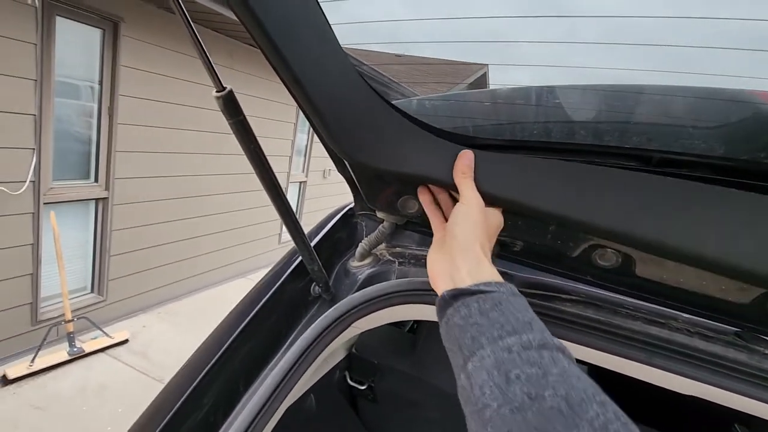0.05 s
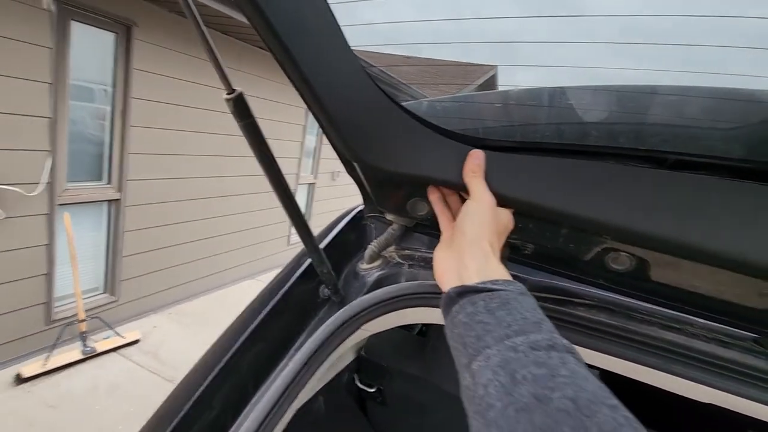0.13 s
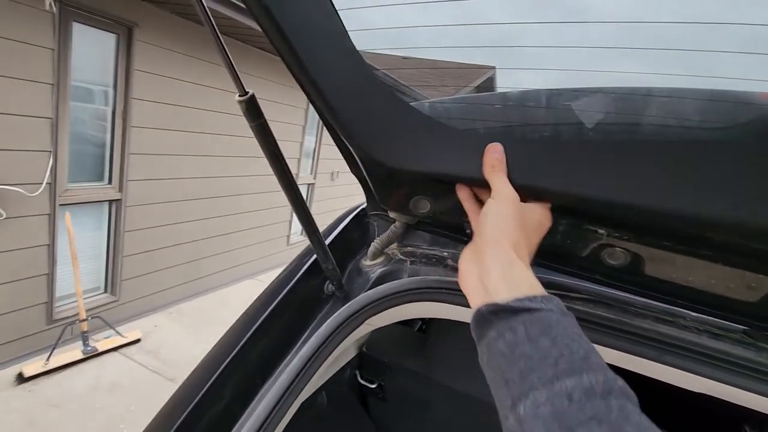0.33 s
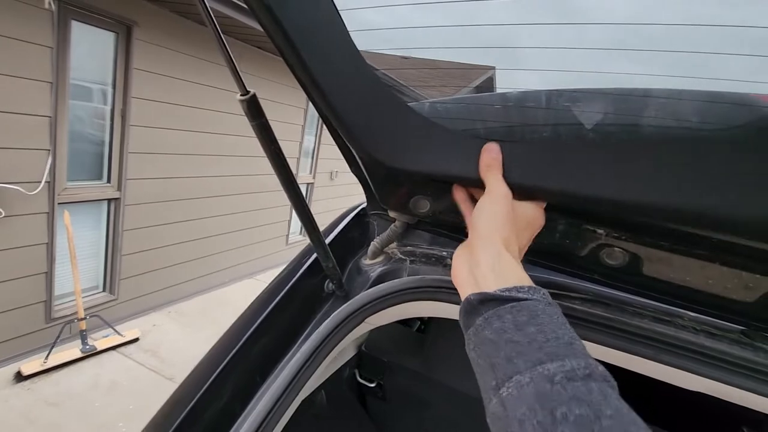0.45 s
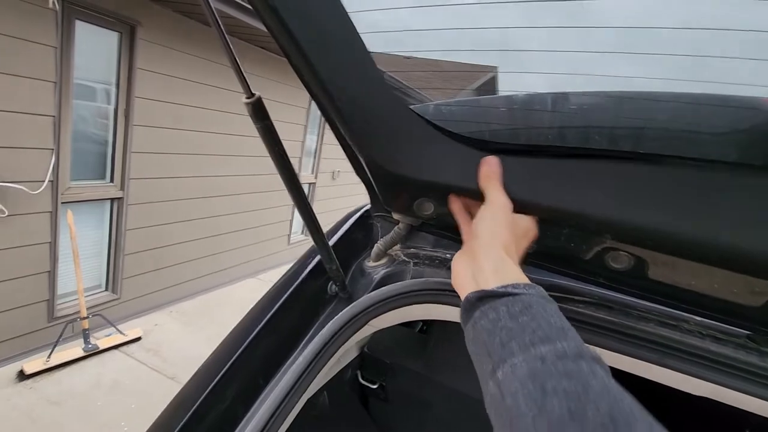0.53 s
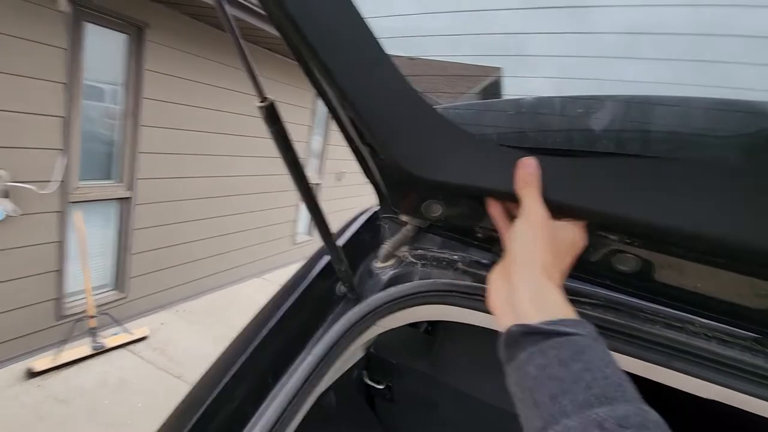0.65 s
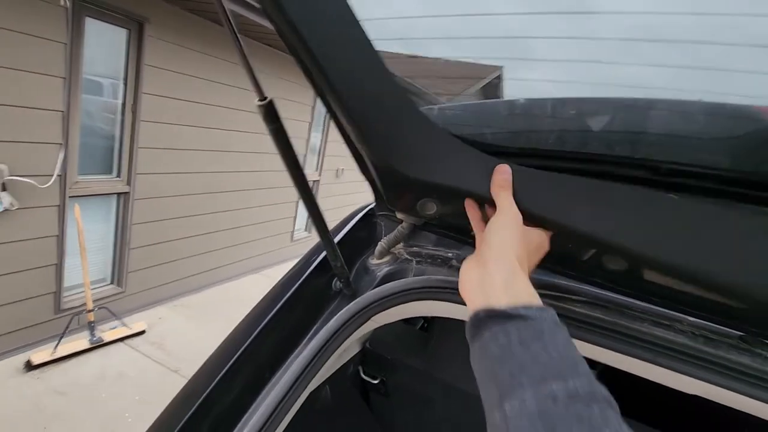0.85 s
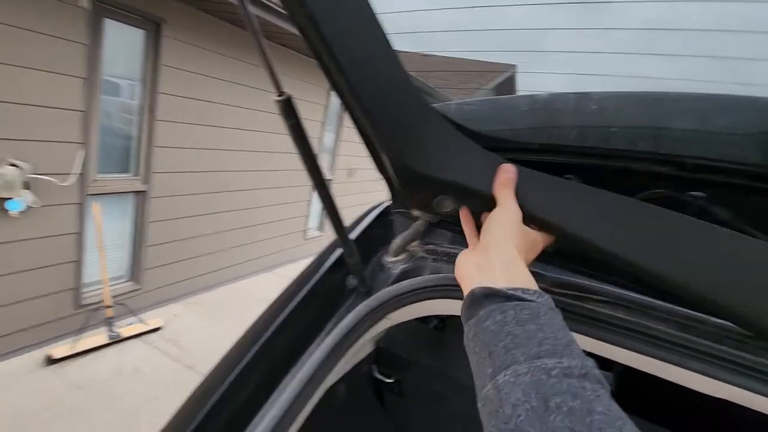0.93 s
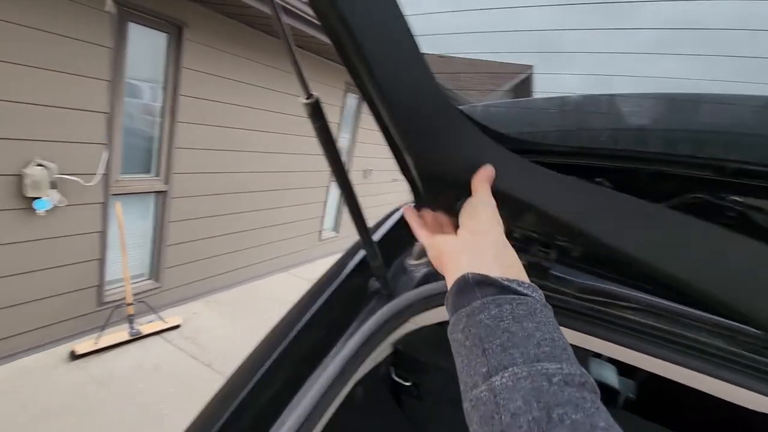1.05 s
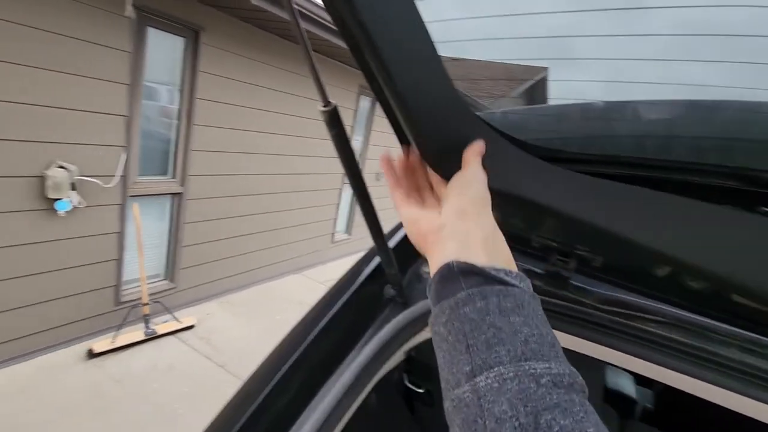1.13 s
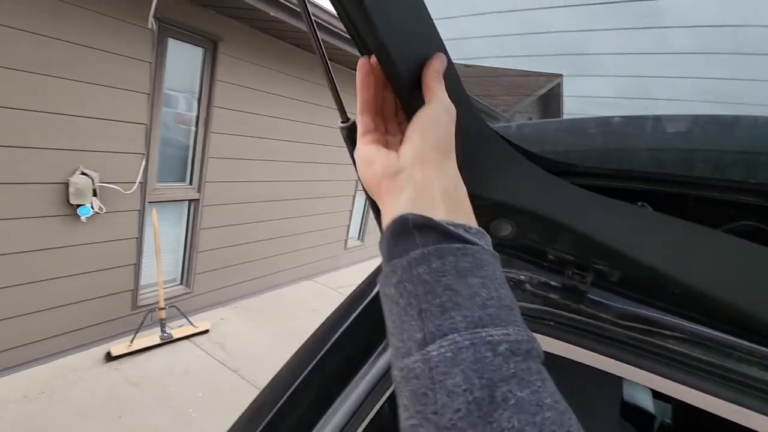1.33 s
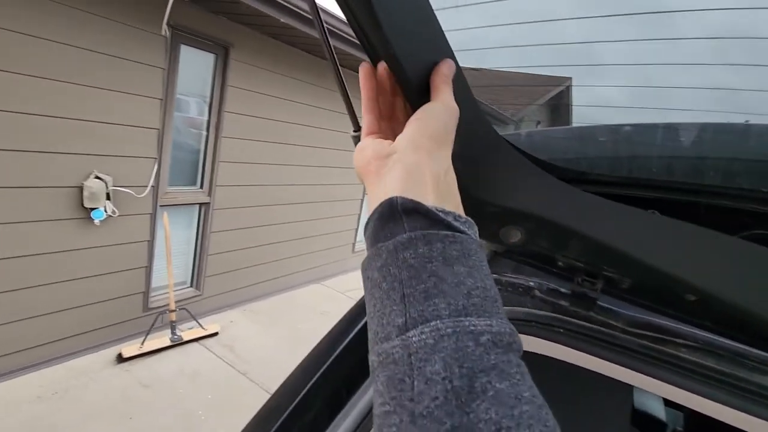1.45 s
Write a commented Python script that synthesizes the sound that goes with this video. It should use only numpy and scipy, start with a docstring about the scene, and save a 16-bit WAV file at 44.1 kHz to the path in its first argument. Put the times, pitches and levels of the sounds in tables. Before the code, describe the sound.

Close plastic snaps come from a car hatch trim panel being pulled loose outdoors. A few clicks, a tiny squeak and one loud crack give way to softer knocks and light hand rubbing, with traffic rumbling faintly far away.

```python
"""Plastic clips slip and snap close by as a hand pulls a trim panel off an open car hatch.
Each snap cracks, knocks the panel's edge, sets its large face booming and rings the steel behind.
The loosened panel shudders. Hiss and scrape come from the rubbing palm and around the biggest snap.
Brief thin tones sound, the loudest just before that snap.
The hatch opening briefly echoes the snaps and tones, and distant traffic rumbles outdoors."""
import sys
import numpy as np
from scipy import signal
from scipy.fft import rfft, irfft, next_fast_len
from scipy.io import wavfile
from scipy.ndimage import map_coordinates

SR = 44100
rng = np.random.default_rng(int(sys.argv[2]) if len(sys.argv) > 2 else 0)


def to_wav(sig):
    """Store sig (one row per channel, or 1-D mono) as 16-bit WAV at the path in sys.argv[1].

    Samples outside -1..1 are clipped; the rate is SR.
    """
    pcm = np.clip(np.atleast_2d(sig), -1, 1) * 32767
    pcm = np.round(pcm).astype(np.int16)
    wavfile.write(sys.argv[1], SR, pcm.T)  # frames by channels


N = 66150

# The tones each part rings at. Each row: pitch in Hz, width in Hz, level in dB.
CLIP_TONES = [(2122, 14, 8.5), (2543, 9.5, 7.5), (3035, 45, 7), (3930, 51, 9.5), (4740, 81, 2),
              (5960, 110, 0.5)]
FACE_TONES = [(117, 15, 6.5), (177.9, 28.2, 7), (255.5, 28.5, 3.5), (406, 130, -7.5)]
SIZZLE_TONES = [(5600, 700, 0), (7500, 770, -0.5), (11950, 910, 0), (14200, 1800, -6)]
STEEL_TONES = [(2478, 50, 4.5), (3604, 240, -9), (5720, 56, -7.5)]
# The panel edge's knock. Each row: multiple of the lowest pitch, width in Hz, level in dB.
EDGE_TONES = [(1, 55, 1), (1.22, 90, -9), (1.68, 90, 0), (2.6, 150, -7)]
# How a snap reaches the two sides. Each row: frequency in Hz, left's lag behind right in radians.
SIDE_LAG = [(200, 0.33), (600, 0.47), (2000, 1.67), (5000, 1.59), (9000, 1.5), (14000, 1.1)]
# Each row: frequency in Hz, left over right in dB.
SIDE_BALANCE = [(100, 2.5), (300, 1), (700, 4.5), (1400, -2), (2800, -5.5), (5600, 8.6), (12000, 1)]
# Each row: start in seconds, crack level in dB, knock, boom and sizzle in dB over the crack,
# left over right in dB, tick fade in seconds, rattle in dB over the tick, rattle fade in seconds,
# lowest knock pitch in Hz. A fade is the time it takes to drop by 60 dB.
SNAPS = [(0.2124, -40, -1, 7, -4.5, -1, 0.012, 4.5, 0.14, 630),
         (.226, -43, 13.5, 10.5, -12.5, -2, .02, -1.5, 0.053, 484),
         (.2395, -25, 4.5, 1, -9.5, 1.5, 0.046, -4.5, 0.051, 788),
         (.255, -38.5, 17, 14.5, -23, -1, 0.014, -4, 0.11, 509),
         (0.4942, -29, 7, -5, -22.5, 0.5, 0.09, -1.5, 0.22, 647),
         (0.5064, -5.5, -3, -10, -11, 0.5, 0.058, -7, 0.095, 593),
         (0.5861, -39.5, -1.5, 1.5, -12.5, -2, 0.088, -3.5, 0.18, 574),
         (.6824, -54.5, 6.5, 21.5, -30, 3, 0.023, -4, 0.044, 583),
         (0.8472, -32.5, 5.5, -6.5, -24.5, 2, 0.044, -11.5, 0.294, 698),
         (.876, -48, 12.5, 16.5, -15, -5, .03, -4, 0.25, 634),
         (0.9027, -58, 16, 1, -7, -18, .01, 1, 0.088, 680),
         (0.9348, -57, 9.5, 11.5, -10, 1.5, 0.013, 8.5, 0.32, 657),
         (0.9563, -46.5, 10, 20, -22, -2, 0.027, 4.5, 0.091, 557),
         (1.02, -61, 15, -4, -29, 2.5, 0.022, 3, 0.063, 682),
         (1.0658, -74.5, 22.5, 21.5, -24, 8.5, 0.038, 2.5, 0.041, 718),
         (1.0897, -40, -37, -16.5, -5.5, 0.5, 0.033, -31.5, 0.049, 625),
         (1.1435, -41, 1.5, 11.5, -9, -0.5, 0.014, -33, 0.068, 652),
         (1.2436, -49, -13, 5, -31, 5, 0.011, -2, 0.24, 657)]


def clip_snaps():
    out, t = np.zeros((2, N + SR)), np.arange(SR // 2) / SR
    first_blow = amp(7) * np.exp(-(t / .00032 - 2) ** 2)

    def pulse(fade_s, rise_s=.00036, hold_s=.00067):
        return (1 - np.exp(-t / rise_s)) * amp(-60 * np.maximum(t - hold_s, 0) / max(fade_s, .003))

    def crack(hz):  # plastic barely rings: wide tones, dulled above 6500 Hz
        return resonances(CLIP_TONES, widen=13)(hz) / (1 + 1j * hz / 6500) ** 2

    def to_stereo(hz):
        right = np.exp(.5j * along(SIDE_LAG, hz)) * amp(-along(SIDE_BALANCE, hz) / 2)
        return np.array([1 / right, right])

    for start, db, knock_db, boom_db, sizzle_db, pan_db, tick_s, rattle_db, rattle_s, knock_hz in SNAPS:
        lumps = amp(2.3 * rng.standard_normal(len(t) // 40 + 1).repeat(40)[:len(t)])
        edge = [(knock_hz * ratio, width, level) for ratio, width, level in EDGE_TONES]
        burst = lambda stretch: pulse(tick_s * stretch) + amp(rattle_db) * pulse(rattle_s * stretch)
        parts = [(crack, burst(1), 0),
                 (resonances(edge), burst(1.32), knock_db),
                 (resonances(FACE_TONES), burst(1), boom_db),
                 (resonances(SIZZLE_TONES), burst(.96), sizzle_db),
                 (resonances(STEEL_TONES), pulse(fade_s=.44), -30.5)]
        snap = 0
        for response, shape, part_db in parts:
            tiny_impacts = rng.standard_normal(len(t)) * lumps
            ring = filtered((first_blow + tiny_impacts) * shape, response)
            snap += .5 * amp(db + part_db) * ring / np.linalg.norm(ring) * np.linalg.norm(shape)
        at = round(start * SR)
        out[:, at:at + len(t)] += filtered(snap, to_stereo) * amp([[pan_db / 2], [-pan_db / 2]])
    return out[:, :N]


# Each row: time in seconds, level of the face's deep tones in dB, level of its upper tones in dB.
SHUDDER_LEVELS = [(0.0, -52, -72), (0.028, -52.5, -50.5), (0.17, -80, -92), (0.242, -50, -30.5),
                  (0.308, -38.5, -40.5), (0.4, -58, -63), (0.458, -61.5, -50), (0.504, -39.5, -34.5),
                  (0.546, -26, -30), (0.568, -28.5, -36.5), (0.604, -45.5, -42.5), (0.634, -29, -44.5),
                  (0.66, -39.5, -51), (0.746, -40, -88), (0.806, -49.5, -60), (0.876, -30.5, -41),
                  (0.918, -50, -44.5), (0.976, -30.5, -33.5), (1.102, -65, -65.5), (1.14, -45.5, -50.5),
                  (1.408, -75.5, -98), (1.5, -64.5, -47.5)]


def panel_shudder():
    """The loosened panel flexes and shudders at the low tones of its face."""
    deep_db, upper_db = curves(SHUDDER_LEVELS)

    def shudder(level_db, tones, cut_below_hz):
        response = lambda hz: resonances(tones)(hz) * np.clip(hz / cut_below_hz, 0, 1) ** 4
        return amp(level_db) * stereo_noise(response)

    deep = shudder(deep_db + .67 * wobble(29.16), FACE_TONES[:2], cut_below_hz=130)
    upper = shudder(upper_db + 3.1 * wobble(30), FACE_TONES[2:], cut_below_hz=200)
    return deep + upper


# The tone colour of the hiss and the scrape. Each row: frequency in Hz, strength in dB.
HISS_COLOUR = [(5000, -39), (8500, -9), (9610, -14), (11700, 2.5), (13400, -1.5), (14900, 3.5),
               (15900, -28.5)]
SCRAPE_COLOUR = [(1060, -51.5), (1800, -15.5), (1970, -27.5), (2200, -19.5), (2530, -20), (3230, -5),
                 (5260, -17), (7450, -13), (9500, -33.5), (12400, -63), (20900, -120)]
# Each row: start, length, rise and fall in seconds (per 20 dB), hiss in dB, scrape in dB.
SCRAPE_SWELLS = [(0.019, 0.02, 0.008, 0.034, -70.5, -68.5), (0.196, .045, .004, 0.0087, -70, -60.5),
                 (0.26, 0.15, .02, 0.043, -83, -75), (0.497, .009, 0.014, 0.0089, -65.5, -33),
                 (0.509, 0.062, 0.014, 0.045, -78, -53), (0.812, 0.068, 0.014, 0.035, -60.5, -61),
                 (.935, .04, .01, 0.015, -65, -73), (1.024, 0.016, 0.011, 0.024, -91, -69),
                 (1.105, 0.024, 0.012, 0.0086, -80, -71), (1.143, 0.071, 0.0052, 0.09, -69.5, -58.5),
                 (1.248, 0.1, 0.024, 0.048, -62.5, -62.5), (1.487, .03, 0.031, 0.0086, -66.5, -58)]


def hiss_and_scrape():
    """Swells of noise: the hand rubbing the plastic, plus the big snap's lead-in and rattling tail."""
    t, hiss, scrape = np.arange(N) / SR, 0, 0
    for start, length, rise, fall, hiss_db, scrape_db in SCRAPE_SWELLS:
        outside_swell = np.maximum((start - t) / rise, (t - start - length) / fall)
        shape = amp(-20 * np.maximum(0, outside_swell))
        hiss += amp(hiss_db) * shape
        scrape += amp(scrape_db) * shape
    hiss = hiss * amp(1.5 * wobble(60.2)) * coloured_noise(HISS_COLOUR)
    scrape = scrape * amp(3.2 * wobble(120)) * coloured_noise(SCRAPE_COLOUR)
    return hiss + scrape


# Each row: start in seconds, length in seconds, pitch in Hz, level in dB.
THIN_TONES = [(.02, .06, 600, -58), (.308, .01, 3300, -58), (.482, .01, 2450, -46), (.488, .017, 3700, -28),
              (.496, .01, 5600, -36), (.567, .006, 2100, -46), (.584, .01, 2430, -35),
              (.885, .02, 2300, -48), (1.172, .022, 3500, -59)]


def thin_tones():
    """Brief, thin, unsteady tones, the loudest just before the big snap."""
    t, out = np.arange(N) / SR, 0
    for start, length, hz, db in THIN_TONES:
        shape = np.clip(np.minimum(t - start, start + length - t) / .004 + 1, 0, 1) ** 2
        phase = 2 * np.pi * np.cumsum(hz * (1 + .012 * wobble(300))) / SR
        out += amp(db + 3 * wobble(400)) * shape * np.array([np.cos(phase), np.sin(phase)])
    return out


# Each row: frequency in Hz, seconds the echo takes to drop by 60 dB.
ECHO_FADES = [(300, 0.57), (2500, 0.34), (6000, 0.47), (12000, 0.57)]


def hatch_echo(sound):
    """The hatch opening throws sound back, and each frequency dies away at its own speed."""
    hz, t, noise = signal.stft(rng.standard_normal((2, SR // 2)), SR, nperseg=256)
    fade = amp(-60 * t / along(ECHO_FADES, hz)[:, None]) * (hz > 300)[:, None]
    tail = signal.istft(noise * fade, SR, nperseg=256)[1]
    delayed = np.pad(sound, ((0, 0), (250, 0)))
    return signal.fftconvolve(delayed, tail / np.linalg.norm(tail[0]), axes=1)[:, :N]


# The tone colour of the rumble and the street's wash. Each row: frequency in Hz, strength in dB.
RUMBLE_COLOUR = [(12, -61.5), (20, -40), (27, -19.5), (59, -5.5), (103, -8), (134, -22.5), (150, -31),
                 (200, -32.5), (330, -120)]
WASH_COLOUR = [(76, -37.5), (130, 3), (197, -6), (282, -1), (344, -16.5), (566, -3.5), (858, -9.5),
               (1200, -10.5), (2230, -21), (2510, -25.5), (15000, -56.5)]
# How each one swells and sinks. Each row: time in seconds, gain in dB.
RUMBLE_SWELL = [(0.0, -46), (0.044, -37), (0.2, -54.5), (0.25, -32), (0.384, -45), (0.508, -41.5),
                (0.558, -34.5), (0.788, -46.5), (0.894, -41.5), (1.132, -50), (1.294, -39.5), (1.5, -57)]
WASH_SWELL = [(0, 3), (.2, 1.5), (.45, 1), (.78, -5), (1.1, -1), (1.4, -1.5), (1.5, 1)]


def distant_traffic():
    """Far-off traffic makes an uneven low rumble over a soft wash of street noise."""
    rumble = amp(curves(RUMBLE_SWELL)[0] + 1.28 * wobble(13.37)) * coloured_noise(RUMBLE_COLOUR)
    wash = amp(-55.5 + curves(WASH_SWELL)[0] + wobble(9.36)) * coloured_noise(WASH_COLOUR)
    return rumble + wash


# Each row: frequency in Hz, how alike left and right are (1 is the same, 0 is unrelated).
SIDE_LIKENESS = [(60, 0.96), (180, 0.98), (550, 0.54), (1650, -0.0032), (4970, -0.21), (15000, 0.16)]


def stereo_noise(response):
    """Filtered noise at a standard level, with left and right alike only in the bass."""
    def spread(hz):
        angle = np.arccos(along(SIDE_LIKENESS, hz)) / 2
        return response(hz) * [np.cos(angle), np.sin(angle)]

    mid, side = filtered(rng.standard_normal((2, N)), spread)
    noise = np.array([mid + side, mid - side])
    return noise / np.sqrt(np.mean(noise ** 2) + 1e-20)


def coloured_noise(colour):
    """Stereo noise shaped by a tone colour table."""
    return stereo_noise(lambda hz: amp(along(colour, hz)))


def resonances(tones, widen=1):
    """A filter for a part that rings at these tones; wider tones die sooner."""
    def response(hz):
        total = 0
        for k, (pitch, width, db) in enumerate(tones):
            damping = 1j * hz * width * widen
            total += (-1) ** k * amp(db) * damping / (pitch ** 2 - hz ** 2 + damping)
        return total
    return response


def filtered(sound, response):
    """Scale and delay each frequency of a sound as response(hz) says."""
    size = next_fast_len(sound.shape[-1] + SR // 4)
    spectrum = rfft(sound, size) * response(np.fft.rfftfreq(size, 1 / SR))
    return irfft(spectrum, size)[..., :sound.shape[-1]]


def wobble(rate):
    """A smooth curve through `rate` random values a second."""
    return map_coordinates(rng.standard_normal(int(N * rate / SR) + 4), [np.arange(N) * rate / SR])


def curves(rows):
    """One value per sample for each column after the time."""
    times, *columns = np.transpose(rows)
    return [np.interp(np.arange(N) / SR, times, column) for column in columns]


def along(rows, hz):
    """Read between the rows of a frequency table, on a log scale."""
    frequencies, values = np.transpose(rows)
    return np.interp(np.log(hz + 1), np.log(frequencies + 1), values)


def amp(db):
    """Turn decibels into a multiplier."""
    return 10 ** (np.asarray(db) / 20)


def scene():
    """Mix all the layers; only the snaps and thin tones echo."""
    near = clip_snaps() + thin_tones()
    return near + amp(-24.5) * hatch_echo(near) + panel_shudder() + hiss_and_scrape() + distant_traffic()


def record(dry):
    """Round off the loudest peaks, turn the highest treble down and cut everything above it."""
    ceiling, dull_hz, top_hz = .95, 15800, 16800
    rounded = dry / (1 + np.abs(dry / ceiling) ** 4) ** .25
    return filtered(rounded, lambda hz: amp(-25 * (hz > dull_hz)) * (hz < top_hz))


dry = scene()
out = record(dry)
to_wav(out)
```